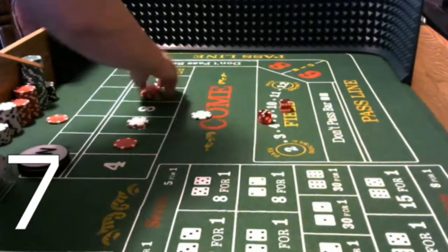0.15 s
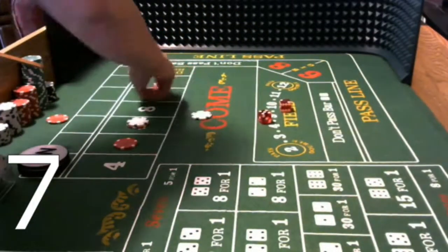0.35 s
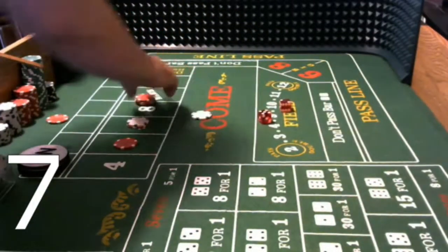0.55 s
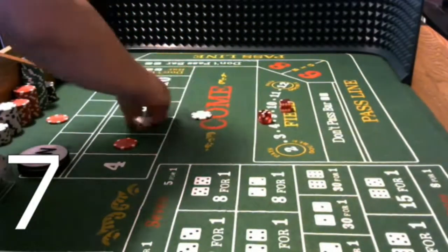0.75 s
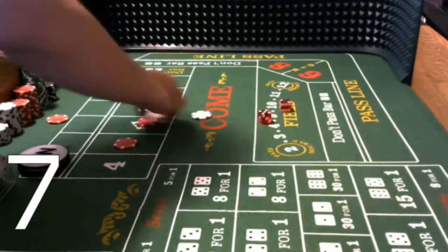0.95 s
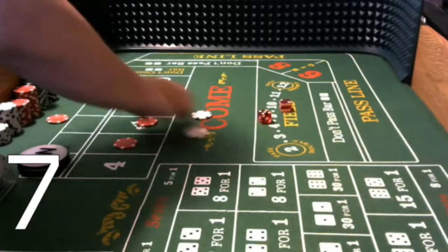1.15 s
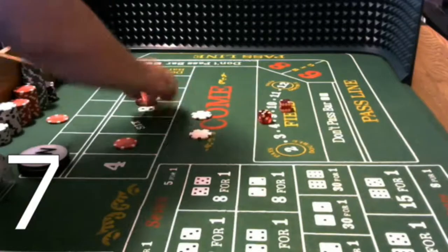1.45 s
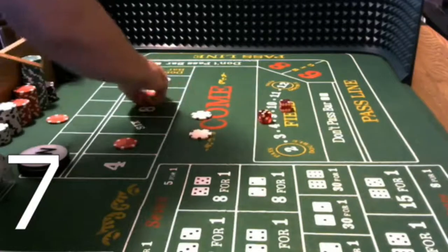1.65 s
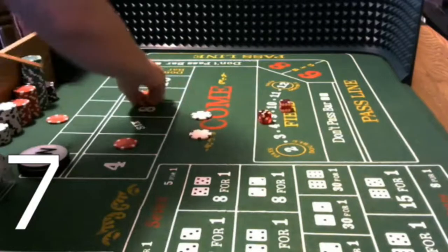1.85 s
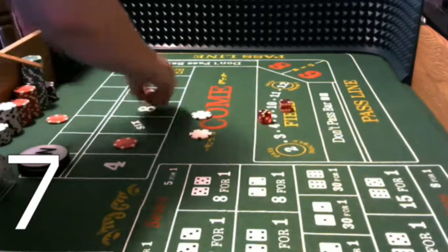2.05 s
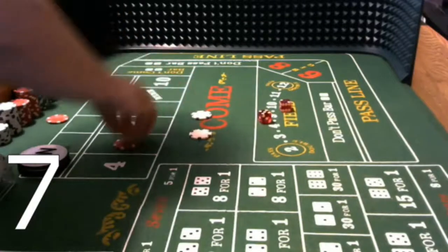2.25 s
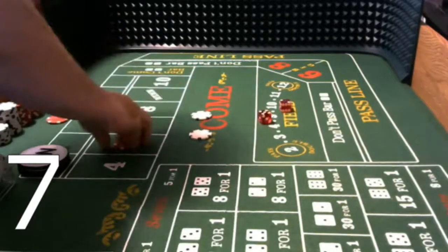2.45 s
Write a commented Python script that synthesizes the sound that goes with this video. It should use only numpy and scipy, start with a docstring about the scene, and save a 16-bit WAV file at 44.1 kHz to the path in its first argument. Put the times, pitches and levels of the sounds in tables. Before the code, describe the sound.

Hard, bright clacks of plastic chips, with soft thuds and short scrapes on felt

```python
"""A hand gathers plastic gaming chips on a felt-covered table in a small, quiet, faintly hissing room.
It opens with a hard chatter of clacks: noise cracks that ring damped chip modes and knock the board.
Soft thuds (board modes and noise), grainy drags over the felt and gliding narrow-band rubs follow.
A second chatter comes past the middle, then more drags and rubs; late on, a hard clack lands.
A light clack and a last short drag close the scene."""
import sys
import numpy as np
from scipy import signal
from scipy.fft import rfft, irfft, next_fast_len
from scipy.io import wavfile
from scipy.ndimage import uniform_filter1d, minimum_filter1d, map_coordinates

SR = 44100
rng = np.random.default_rng(int(sys.argv[2]) if len(sys.argv) > 2 else 0)


def output_pcm(signal):
    """Save a mono or channel-first signal as 16-bit PCM at the path in sys.argv[1].

    Samples are clipped to [-1, 1] before scaling.
    """
    pcm = np.clip(np.atleast_2d(signal).T, -1, 1) * 32767
    wavfile.write(sys.argv[1], SR, np.round(pcm).astype(np.int16))


N = 114660


def amp(db):
    """Decibels to gain."""
    return 10 ** (np.asarray(db) / 20)


def unit(x):
    """Scale to rms 1."""
    return x / np.sqrt(np.mean(x ** 2) + 1e-20)


def along(points, hz):
    """Read (frequency, value) points on a log frequency axis."""
    point_hz, value = np.transpose(points)
    return np.interp(np.log(hz + 1), np.log(point_hz + 1), value)


def coloured(x, gain):
    """Filter x causally (minimum phase) with the given gain over frequency."""
    m = 2 * next_fast_len(len(x) // 2 + 4096)
    log_gain = np.log(np.maximum(gain(np.fft.rfftfreq(m, 1 / SR)), 1e-6))
    # folding the cepstrum onto positive time makes the filter minimum phase
    cepstrum = irfft(log_gain, m)
    cepstrum[1:m // 2] *= 2
    cepstrum[m // 2 + 1:] = 0
    response = np.exp(rfft(cepstrum))
    return irfft(rfft(x, m) * response, m)[:len(x)]


def low_cut(hz, corner_hz):
    """Gain of a gentle first-order low cut."""
    return hz / np.hypot(hz, corner_hz)


def tilt(hz, slope_db, centre_hz):
    """Gain that rises by about slope_db an octave."""
    return amp(slope_db * np.log2((hz + 50) / centre_hz))


def add(track, start_s, sound):
    """Mix a sound into the track at its start time."""
    part = track[max(round(start_s * SR), 0):][:len(sound)]
    part += sound[:len(part)]


# Spectrum of the faint hiss; columns: frequency_hz, level_db
HISS_SPECTRUM = [(15, -40), (25, -11), (157, 2), (354, -16.5), (416, -3), (988, -11.5), (1130, -13),
                 (1440, -12.5), (1840, -12), (2990, -9.5), (4740, -19), (5730, -13), (7110, -5),
                 (8360, -21), (16000, -25)]
HISS_DB = -72  # rms, ahead of the noise suppressor


def hiss():
    """A faint, steady bed of coloured noise."""
    noise = rng.standard_normal(N)
    return amp(HISS_DB) * unit(coloured(noise, lambda hz: amp(along(HISS_SPECTRUM, hz))))


# How long the room's tail takes to fall 60 dB; columns: frequency_hz, t60_s
ROOM_DECAY = [(100, 0.39), (400, 0.38), (1500, 0.28), (4000, 0.3), (6000, 0.25), (9000, .29), (15000, .2)]
# Tone of the room's tail; columns: frequency_hz, level_db
ROOM_TONE = [(100, 0), (400, 0), (1500, 2.5), (4000, -1.5), (6000, 0.5), (9000, -4.5), (15000, 0)]
ROOM_DB, ROOM_BUILD_UP_S = -12.5, .009
RAIL_DB, RAIL_T60_S = -10, .07
RAIL_LOW_HZ = 885  # low cut of the early echoes, which keeps them thin and bright


def room_tail(t):
    """Diffuse reverberation: noise that fades at its own rate in each band."""
    hz, age, bands = signal.stft(rng.standard_normal(len(t)), SR, nperseg=256)
    colour_db = along(ROOM_TONE, hz)[:, None]
    decay_db = 60 * age / along(ROOM_DECAY, hz)[:, None]
    tail = signal.istft(bands * amp(colour_db - decay_db), SR, nperseg=256)[1][:len(t)]
    return tail * np.minimum(t / ROOM_BUILD_UP_S, 1) ** 2


def rail_echoes(t):
    """Early echoes from the table's rails: sparse random clicks that fade, thin and bright."""
    sparse = rng.standard_normal(len(t)) * (rng.random(len(t)) < .04)
    echoes = sparse * amp(-60 * t / RAIL_T60_S) * (t > .002)
    return coloured(echoes, lambda hz: low_cut(hz, RAIL_LOW_HZ))


def room(x):
    """Early echoes and room tail, drawn anew at random for each fifth of the scene."""
    out, t = np.zeros(N), np.arange(SR // 2) / SR
    for part in np.array_split(np.arange(N), 5):
        tail, rails = room_tail(t), rail_echoes(t)
        tail = amp(ROOM_DB) * tail / np.linalg.norm(tail)
        rails = amp(RAIL_DB) * rails / np.linalg.norm(rails)
        add(out, part[0] / SR, signal.fftconvolve(x[part], tail + rails))
    return out


# Narrow, gliding tones of the rubbing;
# columns: start_s, length_s, first_hz, last_hz, level_db, width_hz
RUB_GLIDES = [(0.241, 0.075, 2365, 1993, -59, 250), (0.333, 0.085, 2396, 2525, -60, 300),
              (0.356, 0.074, 1018, 709, -57.5, 465), (0.667, 0.088, 2733, 2155, -62.5, 358),
              (0.722, .18, 2091, 2423, -61.5, 120), (0.991, 0.063, 862, 750, -59, 350),
              (1.225, 0.14, 669.7, 817, -46, 260), (1.358, 0.091, 787, 925, -53.5, 199),
              (1.361, 0.09, 1553, 1720, -48, 140), (1.363, 0.078, 2147, 2050, -60.5, 253),
              (1.366, 0.063, 4060, 4190, -58.5, 176), (1.648, 0.097, 529.4, 420, -58, 198),
              (1.807, .1, 1100, 898.4, -57, 450), (1.914, 0.044, 2240, 2350, -59.5, 180),
              (1.916, 0.061, 3970, 3850, -65.5, 250), (1.98, 0.059, 2926, 2737, -70, 250),
              (2.006, 0.049, 2357, 2500, -63, 225), (2.475, 0.081, 451, 381, -56.5, 230)]


def rubs():
    """Rubbing sings briefly: a gliding carrier, fluttered by slow noise into a narrow band."""
    out = np.zeros(N)
    for start_s, length_s, first_hz, last_hz, level_db, width_hz in RUB_GLIDES:
        count = round(length_s * SR)

        def flutter():
            """Slow noise whose bandwidth sets the width of the band."""
            noise = rng.standard_normal(SR // 4)
            return unit(coloured(noise, lambda hz: 1 / (1 + (2 * hz / width_hz) ** 2))[-count:])

        phase = 2 * np.pi * np.cumsum(np.linspace(first_hz, last_hz, count)) / SR
        swell = np.sin(np.linspace(0, np.pi, count))
        band = flutter() * np.cos(phase) + flutter() * np.sin(phase)
        add(out, start_s, amp(level_db) * swell * band)
    return out


# Tone of chip edges on felt; columns: frequency_hz, level_db
FELT_SPECTRUM = [(40, -31.5), (150, -19), (400, -3.5), (750, 3.5), (1600, 5), (2500, 2.5), (4000, 0.5),
                 (5800, -0.5), (8000, -16), (11000, -37), (16000, -48.5)]
# Drags over the felt; columns: start_s, length_s, level_db, brightness_db_per_octave
FELT_DRAGS = [(.003, 0.016, -55, -1), (0.257, 0.053, -56, 10.5), (0.346, 0.072, -55.5, 5.5),
              (0.703, .028, -50, 9), (1.19, 0.052, -44, -6), (1.247, 0.043, -42, -1),
              (1.325, 0.043, -52.5, 3.5), (1.373, 0.035, -57, -6), (1.525, 0.078, -42.5, -5),
              (1.732, 0.066, -53.5, -2), (1.809, 0.036, -51.5, -3.5), (1.86, 0.036, -49, -2.5),
              (1.908, 0.024, -61, 0), (2.519, 0.032, -58.5, -3.5)]
DRAG_RISE_S, DRAG_FALL_S = 0.004, 0.014
CATCHES_PER_S, CATCH_SHARE = 1400, .5  # grains, and their level against the smooth rub
UNEVEN_DB, UNEVEN_PER_S = 2.78, 62  # the drag sticks and slips
SPEED_UP_S, SLOW_DRAG_HZ = 0.017, 1190  # a drag is dull until the hand has gathered speed


def drags():
    """Chip edges catch on the fibres: tiny grains over an uneven rub that brightens with speed."""
    out, t = np.zeros(N), np.arange(SR // 3) / SR
    for start_s, length_s, level_db, slope_db in FELT_DRAGS:
        rub, size = rng.standard_normal((2, len(t)))
        catches = unit(size * (rng.random(len(t)) < CATCHES_PER_S / SR))
        friction = rub + CATCH_SHARE * catches
        fast = unit(coloured(
            friction, lambda hz: amp(along(FELT_SPECTRUM, hz)) * tilt(hz, slope_db, 2000)))
        slow = coloured(fast, lambda hz: 1 / np.hypot(1, hz / SLOW_DRAG_HZ))
        speed = np.minimum(t / SPEED_UP_S, 1) ** 2
        scrape = slow + speed * (fast - slow)
        release = np.exp(-np.maximum(t - length_s, 0) / DRAG_FALL_S)
        stroke = np.minimum(t / DRAG_RISE_S, 1) * release
        wander = rng.standard_normal(size=128)
        grip_db = UNEVEN_DB * map_coordinates(wander, [t * UNEVEN_PER_S], mode="mirror")
        add(out, start_s, amp(level_db + grip_db) * stroke * scrape)
    return out


MODE_SCATTER_DB, DETUNE = 2.5, 0.0016  # spread of mode level, and of pitch as a fraction


def ring(modes, t, length):
    """Damped sine modes, a little different at every blow; length scales their decay times."""
    hz, level_db, t60_s = np.transpose(modes)[:, :, None]
    size, detune = rng.standard_normal((2, len(modes), 1))
    envelope = amp(level_db + MODE_SCATTER_DB * size - 60 * t / (t60_s * length))
    return np.sum(envelope * np.sin(2 * np.pi * hz * (1 + DETUNE * detune) * t), axis=0)


def burst(spectrum, t, t60_s):
    """A coloured puff of noise that dies away."""
    puff = rng.standard_normal(len(t)) * amp(-60 * t / t60_s)
    return coloured(puff, lambda hz: unit(amp(along(spectrum, hz))))


# Modes of the padded board, decay before shortening; columns: pitch_hz, level_db, t60_s
BOARD_MODES = [(128, -20, .13), (190, -17, .07), (253, -14, .1), (403, 0, .09), (432, -10, .06),
               (570, -6, .09), (655, -13, .06), (727, -10, .07), (791, -12, .07)]
# Tone of the noisy thump in a blow; columns: frequency_hz, level_db
THUMP_SPECTRUM = [(30, -29.5), (75, -45), (130, -5.5), (250, 1), (330, -5), (480, -2), (800, -1.5),
                  (1400, -7.5), (2500, -9.5), (6000, -9), (12000, -35.5)]
BOARD_DB, THUMP_DB, THUMP_T60_S = -2, 1.5, .06  # ring against thump, and the thump's decay


def board(corner_hz, rise_s):
    """One blow on the board; softer contact takes away the upper modes."""
    t = np.arange(SR // 4) / SR
    modes = amp(BOARD_DB) * ring(BOARD_MODES, t, 0.78)  # shortens the listed decays
    thump = amp(THUMP_DB) * burst(THUMP_SPECTRUM, t, THUMP_T60_S)
    onset = 1 - np.exp(-t / rise_s)
    blow = coloured((modes + thump) * onset, lambda hz: 1 / np.sqrt(1 + (hz / corner_hz) ** 6))
    return blow / np.std(blow[:SR // 50])  # even loudness over the first 20 ms


# Soft blows on the felt; columns: start_s, level_db, dullness_corner_hz, rise_s
FELT_THUDS = [(0.01, -61.5, 402.7, 0.012), (.137, -46, 536.5, 0.0022), (0.154, -34.5, 380, .003),
              (0.414, -55, 220, 0.0041), (0.432, -56, 220, .006), (.465, -55, 420, 0.0041),
              (0.493, -54.5, 199.4, .008), (0.649, -51.5, 125.7, 0.0065), (.722, -49, 103, 0.0069),
              (.75, -56, 110, .008), (.845, -45.5, 448.4, .006), (.882, -61.5, 300, .005),
              (1.066, -36, 260, .004), (1.074, -24, 750, .003), (1.081, -24.5, 552, 0.0079),
              (1.121, -49, 406, 0.0022), (1.159, -34, 300, 0.0036), (1.236, -46.5, 140, 0.014),
              (1.29, -48.5, 124, 0.0087), (1.537, -44.5, 286, .006), (1.587, -40.5, 213.2, .003),
              (2.35, -44.5, 130, 0.0023)]


def thuds():
    """Fingers and chips land on the felt and sound the board."""
    out = np.zeros(N)
    for start_s, level_db, corner_hz, rise_s in FELT_THUDS:
        add(out, start_s, amp(level_db) * board(corner_hz, rise_s))
    return out


# What a chip rings with, decay before each contact's length factor; columns: pitch_hz, level_db, t60_s
CHIP_MODES = [(3720, -14, .026), (3880, -8, .02), (4450, -18, .016), (4950, -19, .012), (5400, -12, .016),
              (5720, -7, .018), (5960, -3, .02), (6110, -7, .016), (6450, -11, .011), (6820, -10, .009),
              (7400, -14, .009), (8330, -21, .014), (12550, -38, .02)]
# Tone of the crack at impact; columns: frequency_hz, level_db
CRACK_SPECTRUM = [(100, -50.5), (500, -22.5), (1400, -13.5), (2200, -20), (3300, -13), (6000, 9),
                  (7500, -9.5), (9500, -23), (13000, -33), (16000, -37.5)]
# Chip meets chip; columns: start_s, level_db, ring_length_factor, brightness_db_per_octave
CHIP_CONTACTS = [(0.1351, -11.5, 0.37, -2.5), (0.1368, -11.5, 1.5, 2), (0.1537, 2, 0.2, 0.5),
                 (0.1548, -11.5, 0.62, 2), (0.1582, -4, 0.84, 7.5), (0.455, -46, 2.1, -10.5),
                 (0.4595, -36.5, .8, -3.5), (1.078, -55.5, .4, -2), (1.159, -52, .5, -5),
                 (1.255, -49, .4, 11), (1.3523, -37.5, .5, -2.5), (1.5635, -15, 2.3, 1.5),
                 (1.5776, -16, 1, -13.5), (1.5798, -7, 0.61, -2.5), (1.5817, -7, 1.74, -1),
                 (1.584, -19, 1.1, -4.5), (1.8331, -36, .5, -5), (2.3081, 6, 0.39, 3),
                 (2.3105, -3, 0.82, -1.5), (2.3146, -11.5, 1.5, -5), (2.316, -1.5, .5, -8.5),
                 (2.3169, -6.5, 0.73, -4.5), (2.5374, -22, 0.22, -2)]
CHIP_DB, CHIP_ATTACK_S = -8, .00015
CRACK_DB, CRACK_T60_S = -7, 0.011
# share and band of each clack that reaches the board
CHIP_KNOCK_DB, CHIP_KNOCK_HZ, CHIP_KNOCK_LOW_HZ = -39, 850, 350


def clacks():
    """Each contact cracks, rings the chips and knocks the board."""
    out, t = np.zeros(N), np.arange(SR // 8) / SR
    onset = 1 - np.exp(-t / CHIP_ATTACK_S)
    for start_s, level_db, length, slope_db in CHIP_CONTACTS:
        ringing = amp(CHIP_DB) * ring(CHIP_MODES, t, length)
        crack = amp(CRACK_DB) * burst(CRACK_SPECTRUM, t, CRACK_T60_S)
        # below 2500 Hz the tilt stays flat
        chip = coloured((ringing + crack) * onset,
                        lambda hz: tilt(np.maximum(hz, 2500), slope_db, 5800))
        knock = coloured(board(CHIP_KNOCK_HZ, .0006), lambda hz: low_cut(hz, CHIP_KNOCK_LOW_HZ))
        add(out, start_s, amp(level_db) * chip)
        add(out, start_s, amp(level_db + CHIP_KNOCK_DB) * knock)
    return out


def scene():
    """The hand's work in the room, over a faint hiss."""
    table = clacks() + thuds() + drags() + rubs()
    return (table + room(table) + hiss())[None]


# The recorder's noise suppressor turns down whatever is under this threshold;
# columns: frequency_hz, level_db (as white noise)
SUPPRESSOR_THRESHOLD = [(100, -59), (400, -59), (1000, -53.5), (2500, -57.5), (4500, -72.5), (7000, -69),
                        (10000, -67.5), (15000, -74.5)]
SUPPRESS_DB = -7  # most it turns down


def suppressed(x):
    """Turn down each band while it is quiet, which cuts tails short."""
    hz, _, bands = signal.stft(x, SR, nperseg=512)
    power = np.abs(bands) ** 2 * 512 / 1.5  # in terms of white noise
    power = uniform_filter1d(power, size=5, axis=0)  # smooth over frequency, then time
    power = np.abs(uniform_filter1d(power, size=3, axis=1))
    threshold = amp(along(SUPPRESSOR_THRESHOLD, hz))[:, None] ** 2
    excess = (power / threshold) ** 2
    return signal.istft(bands * amp(SUPPRESS_DB / (1 + excess)), SR, nperseg=512)[1][:N]


LOW_CUT_HZ, TOP_HZ = 120, 16100
CEILING_DB, LIMITER_HOLD_S = -2.2, .001


def limited(x):
    """Pull down peaks above the ceiling with a briefly held, smoothed gain."""
    hold = max(round(LIMITER_HOLD_S * SR), 1)
    gain = np.minimum(1, amp(CEILING_DB) / (np.abs(x) + 1e-9))
    return x * uniform_filter1d(minimum_filter1d(gain, hold), hold)


def record(dry):
    """The recorder suppresses noise, cuts deep bass, limits peaks and stops at its band limit."""
    x = coloured(suppressed(dry[0]),
                 lambda hz: (hz ** 2 + 100) / np.hypot(hz ** 2, LOW_CUT_HZ ** 2))
    x = limited(x)
    m = next_fast_len(N + SR // 2)
    steep_cut = 1 + (np.fft.rfftfreq(m, 1 / SR) / TOP_HZ) ** 120
    return irfft(rfft(x, m) / steep_cut, m)[None, :N]


dry = scene()
out = record(dry)
output_pcm(out)
```